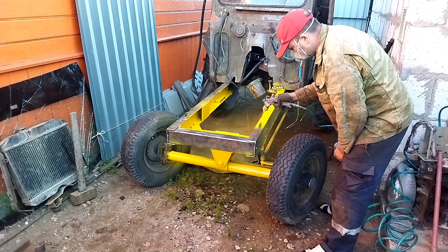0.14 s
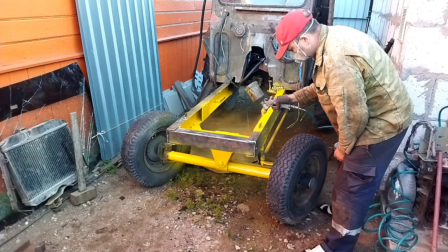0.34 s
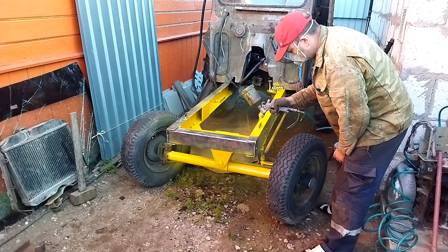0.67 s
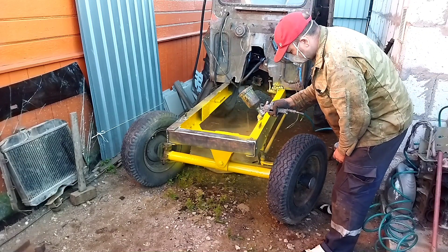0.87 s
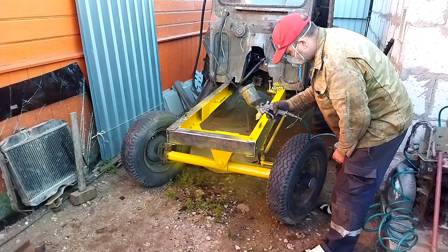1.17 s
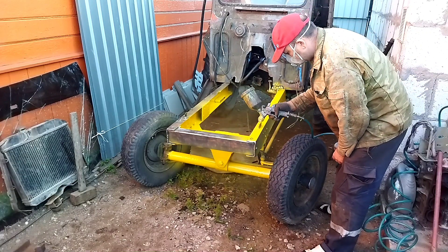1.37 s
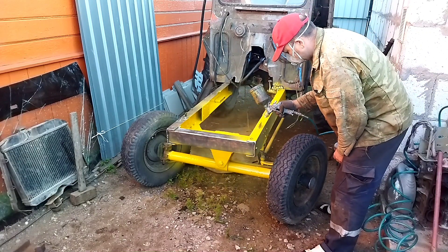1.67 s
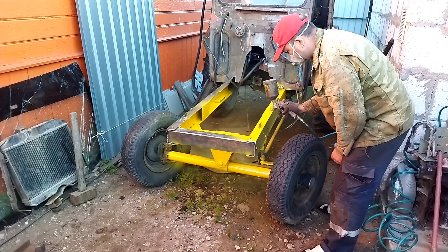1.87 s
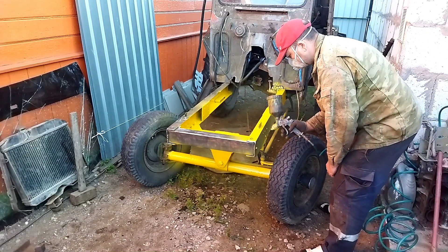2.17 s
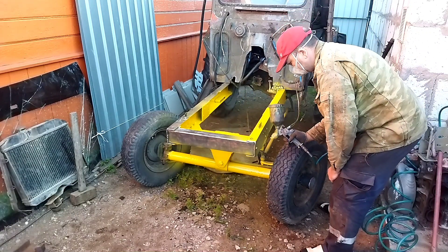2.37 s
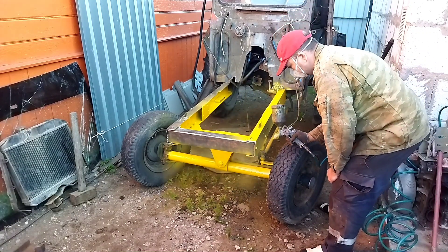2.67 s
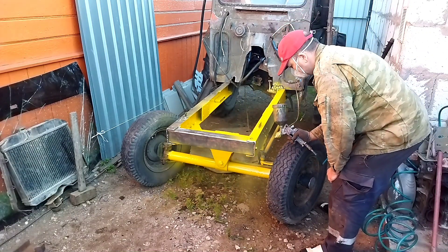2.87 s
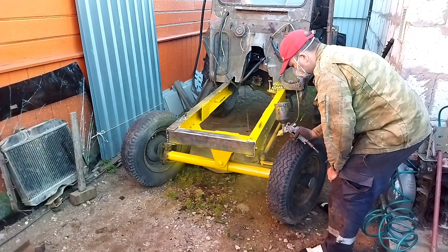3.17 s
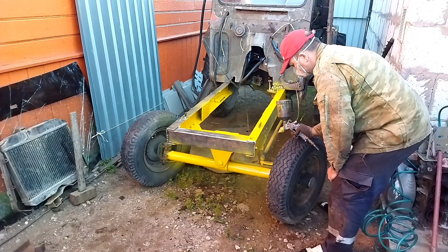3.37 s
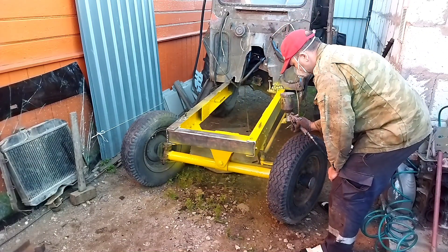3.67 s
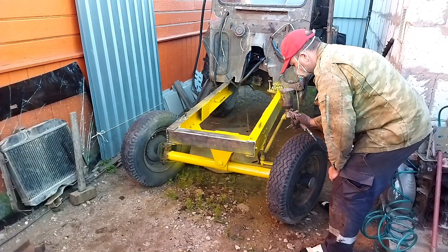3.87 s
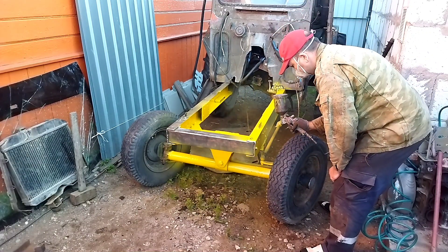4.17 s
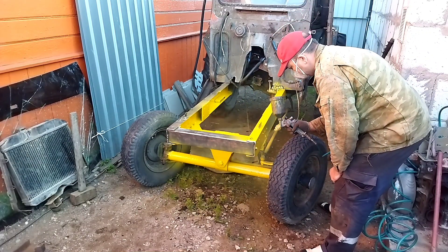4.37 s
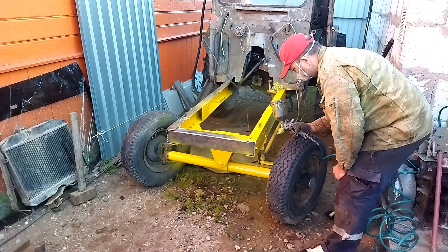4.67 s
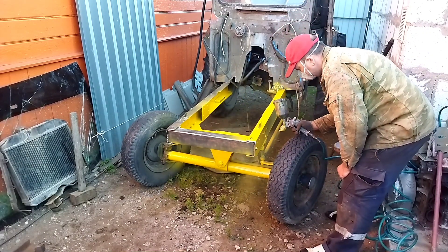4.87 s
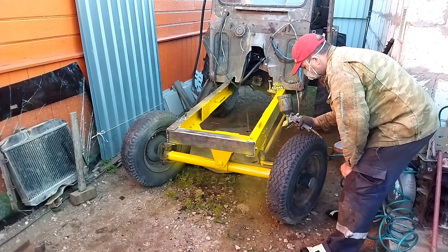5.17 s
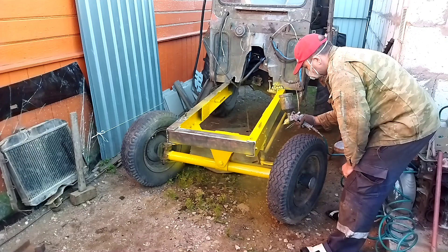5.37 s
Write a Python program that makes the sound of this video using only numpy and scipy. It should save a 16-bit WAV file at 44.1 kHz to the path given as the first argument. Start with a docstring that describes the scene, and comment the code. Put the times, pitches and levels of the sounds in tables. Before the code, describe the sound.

Sharp, airy paint-sprayer bursts with brief gaps; around two seconds a compressor shudders up to speed and drones softly to the right.

```python
"""A compressed-air spray gun paints a steel frame in a walled yard, over faint outdoor air.
The first of five hissing bursts is already under way; in the first two, a rumble on the steel comes and goes.
Near 2 s a piston compressor rattles, shudders up to speed and hums on to the right.
Three more bursts follow over a steadier rumble, the last still sounding at the end.
Shaped noise makes the jet, echo and air; sine tones tied to a turning shaft, plus noise, make the compressor."""
import sys
import numpy as np
from scipy import signal
from scipy.fft import rfft, irfft, next_fast_len
from scipy.io import wavfile
from scipy.ndimage import uniform_filter1d, map_coordinates

SR = 44100
rng = np.random.default_rng(int(sys.argv[2]) if len(sys.argv) > 2 else 0)


def store_pcm(level_fs):
    """Save levels as 16-bit WAV."""
    pcm = np.round(np.clip(level_fs, -1, 1) * 32767).astype(np.int16)
    wavfile.write(sys.argv[1], SR, np.atleast_2d(pcm).T)


N = 243873

# trigger pulls: valve opens t/s, squeeze takes t/s, valve closes t/s, settled hiss level/dB,
# settled rush level/dB, hiss surge level/dB, rush surge level/dB, surge sags in t/s,
# closing swell level/dB, opening spit level/dB, rush width level/dB
TRIGGER_PULLS = [(-.1, .02, 1.1455, -21.3, -33.4, -1, -1, .4, .8, 0, -.7),
                 (1.293, 0.033, 1.869, -22.8, -36.5, 4.7, 6, 0.35, 0.5, -3, -1),
                 (2.293, .024, 3.712, -24.3, -35.6, 5.9, 4.8, 0.7, .6, 1.5, 1.2),
                 (3.842, 0.027, 4.477, -24.4, -35.7, 4, 2, .15, 4.8, -1, .6),
                 (4.606, 0.024, 5.665, -24.4, -35.3, 7, 3, 0.49, -1, 0, 1.3)]
# how hard the jet strikes the frame in the first two bursts: t/s, rumble level/dB
FRAME_STRIKE = [(0.02, -48), (0.35, -54.5), (0.65, -47), (0.74, -51.5), (1.012, -48), (1.12, -58.5),
                (1.36, -77), (1.454, -53), (1.85, -46)]
# the paint fan crosses an edge of the frame: t/s, half width t/s, centre f/Hz, peak level/dB
FRAME_EDGES = [(0.9, .08, 1100, -50), (1.125, .04, 3070, -45), (1.328, 0.025, 5030, -33),
               (1.405, 0.08, 3430, -37), (1.62, .13, 1990, -48), (3.92, 0.051, 3520, -40),
               (4.755, 0.057, 2000, -42.5)]
# the second pull opens with a very wide hiss: t/s, half width t/s, added left-right gain level/dB
WIDE_OPENING = (1.335, .035, 5)
# how strong each pitch is in the noises: f/Hz, relative level/dB
HISS_SPECTRUM = [(3000, -50), (7400, -24), (7900, -14.5), (8300, -7.5), (8900, -3), (9900, -4.3),
                 (10950, -4.7), (11420, -12), (11700, 1.3), (12500, -1.7), (13400, -3.3), (14900, -2.7),
                 (15720, .5), (16300, -60)]
RUSH_SPECTRUM = [(100, -50), (600, -14), (1000, -9), (1800, -4.5), (2700, -3.2), (3400, -1.3), (4000, -1.6),
                 (4550, .7), (4950, -1), (5800, -.7), (6750, 4), (7000, -2), (7500, -1.5), (9000, -5),
                 (13000, -25)]
RUMBLE_SPECTRUM = [(25, -50), (70, -16.5), (130, -7), (200, -1.5), (300, 1), (550, 1), (850, -5),
                   (1500, -19), (4000, -45)]
CHURN_SPECTRUM = [(25, -28), (50, -14), (100, -12.5), (160, 0), (400, 0.5), (700, -5), (1000, -1),
                  (1900, -5.5), (2800, -15), (5000, -18), (9000, -30.5), (15000, -25)]
YARD_SPECTRUM = [(25, -34), (60, -15), (150, 0.5), (400, -5), (900, -5), (2000, -14), (5000, -14),
                 (15000, -22)]
# how alike left and right are, for near and far sounds: f/Hz, likeness/-1..1
NEAR_LIKENESS = [(30, .75), (130, .92), (300, .82), (600, .55), (1200, .2), (2100, .45), (3000, .12),
                 (4000, 0), (4900, -.45), (6500, -.35), (7600, .1), (9500, .76), (12500, .9), (15500, .78)]
FAR_LIKENESS = [(80, 1), (300, 0.13), (600, -0.53), (1100, -0.75), (1900, 0.22), (4000, -0.16)]
# how long the yard's echo takes to drop 60 dB: f/Hz, t/s
ECHO_TIMES = [(200, 0.25), (2000, 0.37), (8000, 0.38), (15000, 0.28)]
# compressor tones: multiple of the shaft speed
SHAFT_MULTIPLES = [2, 3, 4, 5, 6, 7, 8, 9, 10, 11, 12, 13, 14, 15, 17, 18, 32]
# strength of each of those tones: relative left level/dB, relative right level/dB
TONE_LEVELS = [(-10, -10), (-26, -26), (-8.5, -7.5), (-5.5, -4), (-22, -5.5), (-2.5, -0.5), (5.6, 6.1),
               (1.5, -7), (-18, -0.5), (-16, -9), (-18, -1), (1.5, 3), (-22, -21), (-10, -24), (-7, -3.5),
               (-22, 0), (-24, -8)]
# cylinder head resonances: centre f/Hz, width f/Hz, relative level/dB (before squaring)
HEAD_RESONANCES = [(396, 140, 0), (526, 56, 0)]
# the valves rattle on the first strokes: t/s, half width t/s, level/dB
VALVE_RATTLE = (2.056, 0.024, -51.5)
# tank and mount resonances shaken in the run-up: f/Hz, width f/Hz, level/dB, from t/s, until t/s
SHAKEN_PARTS = [(605, 22.7, -58, 2.128, 2.178), (522, 12.5, -51.5, 2.138, 2.32),
                (375, 26.2, -48, 2.166, 2.3), (172.5, 18.3, -54.5, 2.2, 2.33)]
# the unloader valve shuts with a faint puff: t/s, half width t/s, level/dB
UNLOADER_PUFF = (2.137, 0.026, -60)

SPIT_S = 0.035  # the first instant of a pull spits, or chokes on paint
SWELL_S = 0.25  # the hiss changes over this time as the hand swings out at the end of a stroke
RUSH_SWELLS = 0.4  # share of that change, in dB, that the paint fan follows
BLEED_T60_S = 0.1  # the air cap empties once the needle reseats
HISS_PAN_DB, RUSH_PAN_DB = 0.7, 1.4  # left minus right
WIDTH_WANDER_DB = 2.5  # the hiss narrows and widens as the hand sways
GRAZING_DB = -51  # rumble after the strikes, when the jet only grazes the frame
EDGE_SPREAD = 3.6  # frequency ratio from the centre of an edge rush to its skirts
ECHO_DB = -14.5  # echo compared with the gun
YARD_DB = -59.5
# compressor run-up: the speed rises in an S-shape, and the load follows it
HALF_SPEED_S, SPIN_UP_S = 2.09, 0.085  # halfway up to speed, time scale of the rise
HALF_LOAD_S, LOAD_S = 2.186, 0.14  # half loaded, time scale of the loading and of the fade-in
START_S = 1.86  # middle of the fade-in
START_HZ, RUNNING_HZ = 23, 45.17  # shaft turns per s
HUM_DB, HUM_UNLOADED_DB = -40.7, -25  # hum at full load; change with no load
WHINE_DB, WHINE_UNLOADED_DB = -116.5, -60  # motor whine, likewise: far below hearing
CHATTER_DB = -60.5  # valves once they seat cleanly
STRAIN_S, SWITCH_S = 1.985, 2.15  # the start winding whines from here until its switch opens
STRAIN_DB, STRAIN_HZ = -65, 1720  # typical level of that whine, pitch as the switch opens
STRAIN_RISE_HZ_PER_S, STRAIN_WIDTH_HZ = 500, 32  # its glide and blur
TOP_HZ = 15780  # nothing much is kept above this


def spray_gun():
    """Bright nozzle hiss, the duller rush of the paint fan, and its rumble on the steel."""
    t = np.arange(N) / SR
    air_flow = hiss_level = rush_level = rush_width_db = 0
    for (on, squeeze, off, hiss_db, rush_db, hiss_surge_db, rush_surge_db,
         sag_s, swell_db, spit_db, width_db) in TRIGGER_PULLS:
        flow, surge, swell, spit = trigger_pull(t, on, squeeze, off, sag_s)
        air_flow = air_flow + flow
        rush_width_db = rush_width_db + flow * width_db
        pull_hiss_db = hiss_db + hiss_surge_db * surge + swell_db * swell + spit_db * spit
        pull_rush_db = rush_db + rush_surge_db * surge + RUSH_SWELLS * swell_db * swell
        hiss_level = hiss_level + flow * amp(pull_hiss_db)
        rush_level = rush_level + flow * amp(pull_rush_db)

    jet = noise(HISS_SPECTRUM, NEAR_LIKENESS, patchy_db=7.5)
    nozzle = glancing(jet, strength=0.19, reach_s=0.007, sway_s=0.0001)
    hiss_width = amp(WIDTH_WANDER_DB * wobble(13)) + bump(*WIDE_OPENING)
    hiss = hiss_level * pan(HISS_PAN_DB) * widen(nozzle, hiss_width)

    fan = noise(RUSH_SPECTRUM, NEAR_LIKENESS, patchy_db=6.5)
    rush = rush_level * pan(RUSH_PAN_DB) * widen(fan, amp(rush_width_db))

    strike_db = np.interp(t, *np.transpose(FRAME_STRIKE), right=GRAZING_DB)
    rumble_level = air_flow * amp(strike_db + 0.59 * wobble(17))
    rumble = rumble_level * noise(RUMBLE_SPECTRUM, NEAR_LIKENESS, patchy_db=2.5)

    sputter = amp(0.64 * wobble(40) + 0.079 * wobble(230))  # the paint tears off the tip unevenly
    return sputter * (hiss + rush + air_flow * edge_rush()) + rumble


def trigger_pull(t, on, squeeze, off, sag_s):
    """Shapes from 0 to 1: needle valve air flow, surge of stored hose pressure, closing swell, opening spit."""
    opening = np.clip((t - on) / squeeze, 0, 1) ** 2
    bleed = amp(-60 * np.maximum(t - off, 0) / BLEED_T60_S)
    surge = np.exp(-np.maximum(t - on, 0) / sag_s)
    swell = np.exp(-np.maximum(off - t, 0) / SWELL_S)
    spit = np.exp(-np.maximum(t - on - squeeze, 0) / SPIT_S)
    return opening * bleed, surge, swell, spit


def glancing(x, strength, reach_s, sway_s, count=8):
    """Reflections off frame and ground: drifting delays change the colour, while the power is held even."""
    out = x.copy()
    for delay in rng.uniform(reach_s / 10, reach_s, count):
        when = np.arange(N) - SR * (delay + sway_s * wobble(3))
        out += strength * np.array([map_coordinates(ear, [when], order=3) for ear in x])
    power = uniform_filter1d(np.mean(out ** 2, axis=0), size=2500)
    return out / np.sqrt(np.abs(power) + 1e-9)


def edge_rush():
    """Where the fan crosses an edge of the frame, a broad band of rush flares up."""
    total = 0
    for s, half_width_s, hz, db in FRAME_EDGES:
        band = [(hz / EDGE_SPREAD, -30), (hz, 0), (hz * EDGE_SPREAD, -30)]
        total = total + bump(s, half_width_s, db) * noise(band, NEAR_LIKENESS, patchy_db=1.5)
    return total


def walls(x):
    """The yard's short echo: noise dying away, at a pace that depends on pitch."""
    hz, t, z = signal.stft(rng.standard_normal((2, SR // 2)), SR, nperseg=256)
    fade = amp(-60 * t / along(ECHO_TIMES, hz)[:, None])
    tail = signal.istft(z * fade, SR, nperseg=256)[1]
    return signal.fftconvolve(x, tail / np.linalg.norm(tail[0]), axes=1)[:, :N]


def compressor(lag_s, churn_db, throb, smear, limp, whine_width_hz):
    """Piston strokes hum on multiples of the shaft speed; air churns in the intake and valves chatter."""
    speed, hum_level, chatter_level, whine_level = run_up()
    shaft = 2 * np.pi * np.cumsum(speed * (1 + 0.00019 * wobble(12))) / SR  # angle in radians
    ears = np.array([shaft - 2 * np.pi * speed * lag_s, shaft])  # left hears it later: it stands right
    hum, ring = 0, ringing_phases()
    for k, (left, right) in zip(SHAFT_MULTIPLES, TONE_LEVELS):
        # tank and pipes delay the higher tones more, which smears each stroke over the turn
        tone = np.sin(k * ears + ring[k] - smear * k * k)
        hum = hum + amp([[left], [right]]) * amp(0.62 * wobble(7)) * tone
    hum = unit(hum) * (1 + limp * np.cos(shaft / 2))  # loudness sways once every two turns

    stroke = 0.5 + 0.5 * np.cos(2 * shaft)  # two gulps of air a turn
    churn_noise = noise(CHURN_SPECTRUM, FAR_LIKENESS, patchy_db=4.0)
    churn = amp(churn_db) * (1 + throb * (stroke - 0.5)) * churn_noise  # compared with the hum

    slaps = stroke ** 24 * (1 + 6 * rng.standard_normal((2, N)))  # each valve shuts: a knock and a puff
    chatter = chatter_level * unit(filtered(slaps, cylinder_head))

    unsettled = np.clip(speed[-1] - speed, 0, 1)  # the whine is rough until the shaft is up to speed
    flutter = 2 * np.pi * np.cumsum(whine_width_hz * unsettled * wobble(150.6)) / SR
    whine = whine_level * amp(2 * wobble(9)) * np.sin(40 * shaft + flutter)
    return hum_level * (hum + churn) + chatter + whine + start_up(stroke, throb=0.95)


def run_up():
    """Shaft speed and the gains of hum, chatter and whine as the compressor takes up its load."""
    t = np.arange(N) / SR
    rise = lambda half_s, scale_s: 0.5 + 0.5 * np.tanh((t - half_s) / scale_s)
    running = np.clip((t - START_S) / LOAD_S + 0.5, 0, 1)
    speed = START_HZ + (RUNNING_HZ - START_HZ) * rise(HALF_SPEED_S, SPIN_UP_S)
    load = rise(HALF_LOAD_S, LOAD_S)
    hum = amp(HUM_DB + HUM_UNLOADED_DB * (1 - load))
    chatter = amp(CHATTER_DB) * load + bump(*VALVE_RATTLE)
    whine = amp(WHINE_DB + WHINE_UNLOADED_DB * (1 - load))
    return speed, running * hum, running * chatter, running * whine


def ringing_phases():
    """Tank and pipes ring after each stroke, never before it: the causal phase of every tone."""
    k = np.abs(np.arange(128) - 64)
    log_gain = np.interp(k, SHAFT_MULTIPLES, np.log(amp(TONE_LEVELS).mean(axis=1)))
    return -signal.hilbert(np.fft.ifftshift(log_gain)).imag


def cylinder_head(hz):
    """The metal head rings around its resonances; squaring the response makes them sharper."""
    response = 0
    for centre, width, db in HEAD_RESONANCES:
        damping = 1j * hz * width
        response = response + amp(db) * damping / (centre ** 2 - hz ** 2 + damping)
    return response ** 2


def start_up(stroke, throb):
    """The start winding whines; the gathering shaft shakes tank and mounts; the unloader valve puffs."""
    t = np.arange(N) / SR
    strain_hz = STRAIN_HZ + STRAIN_RISE_HZ_PER_S * (t - SWITCH_S)
    strain_level = amp(STRAIN_DB + 3.0 * wobble(70)) * gate(STRAIN_S, SWITCH_S, ramp_s=0.08)
    strain = strain_level * blurred_tone(strain_hz, STRAIN_WIDTH_HZ)
    shudder = 0
    for hz, width_hz, db, start, end in SHAKEN_PARTS:
        shudder = shudder + amp(db) * gate(start, end, ramp_s=0.046) * blurred_tone(hz, width_hz)
    puff = bump(*UNLOADER_PUFF) * noise(HISS_SPECTRUM, FAR_LIKENESS, patchy_db=0.0)
    return strain + (1 + throb * (stroke - 0.5)) * shudder + puff


def yard_air():
    """Faint outdoor air: mostly low, soft noise."""
    return amp(YARD_DB) * noise(YARD_SPECTRUM, NEAR_LIKENESS, patchy_db=-1.0)


def noise(spectrum, alike, patchy_db):
    """Stereo noise of rms 1, with random uneven gain over pitch and time."""
    z = signal.stft(rng.standard_normal((2, N)), nperseg=512)[2]
    field = uniform_filter1d(rng.standard_normal(z.shape[1:]), size=2, axis=0)  # blurred over pitch
    field = uniform_filter1d(field, size=10, axis=1)  # and twice over time
    field = unit(uniform_filter1d(field, size=3, axis=1))
    uneven_gain = amp(patchy_db * np.minimum(field, 0.5))
    pair = signal.istft(z * uneven_gain, nperseg=512)[1][:, :N]

    def mid_side(hz):
        # likeness 1 is all middle, -1 is all left-right difference
        turn = np.arccos(np.clip(along(alike, hz), -1, 1)) / 2
        return amp(along(spectrum, hz)) * np.array([np.cos(turn), np.sin(turn)])

    mid, side = filtered(pair, mid_side)
    return unit(np.array([mid + side, mid - side]))


def blurred_tone(hz, width_hz):
    """A tone of rms 1 whose pitch flutters over a narrow band."""
    return unit(np.sin(2 * np.pi * np.cumsum(hz + width_hz * wobble(120)) / SR))


def widen(x, side_gain):
    """Scale the left-right difference of a pair; its power stays."""
    mid, side = (x[0] + x[1]) / 2, (x[0] - x[1]) / 2
    power = (np.mean(mid ** 2) + side_gain ** 2 * np.mean(side ** 2)) / np.mean(x ** 2)
    return np.array([mid + side_gain * side, mid - side_gain * side]) / np.sqrt(power)


def pan(left_minus_right_db):
    """Gains that lean a pair to one side."""
    return amp([[left_minus_right_db / 2], [-left_minus_right_db / 2]])


def bump(s, half_width_s, db):
    """A bell-shaped swell of gain."""
    return amp(db) * np.exp(-((np.arange(N) / SR - s) / half_width_s) ** 2)


def gate(start, end, ramp_s):
    """1 between two times, with soft edges."""
    t = np.arange(N) / SR
    return np.clip(np.minimum(t - start, end - t) / ramp_s + 0.5, 0, 1)


def wobble(rate):
    """A smooth random curve, rate knots a second."""
    return map_coordinates(rng.standard_normal(int(N * rate / SR) + 4), [np.arange(N) * rate / SR])


def filtered(x, response):
    """Reshape the strength of each frequency in x."""
    m = next_fast_len(N + SR // 2)
    return irfft(rfft(x, m) * response(np.fft.rfftfreq(m, 1 / SR)), m)[..., :N]


def along(points, hz):
    """Read (frequency, value) points at any frequency, on a log axis."""
    f, v = np.transpose(points)
    return np.interp(np.log(hz + 1), np.log(f + 1), v)


def unit(x):
    """Scale to rms 1."""
    return x / np.sqrt(np.mean(x ** 2) + 1e-20)


def amp(db):
    """Decibels to gain."""
    return 10 ** (np.asarray(db) / 20)


def scene():
    """The gun a little to the left with its echo, the compressor to the right, over faint outdoor air."""
    gun = spray_gun()
    machine = compressor(lag_s=0.0005, churn_db=-6.0, throb=0.67, smear=0.17, limp=0.065,
                         whine_width_hz=20.0)
    return gun + amp(ECHO_DB) * walls(gun) + machine + yard_air()


def record(dry):
    """Cut the highest treble, fading out over 160 Hz around the top frequency."""
    return filtered(dry, lambda hz: np.clip((TOP_HZ - hz) / 160 + 0.5, 0, 1))


dry = scene()
out = record(dry)
store_pcm(out)
```